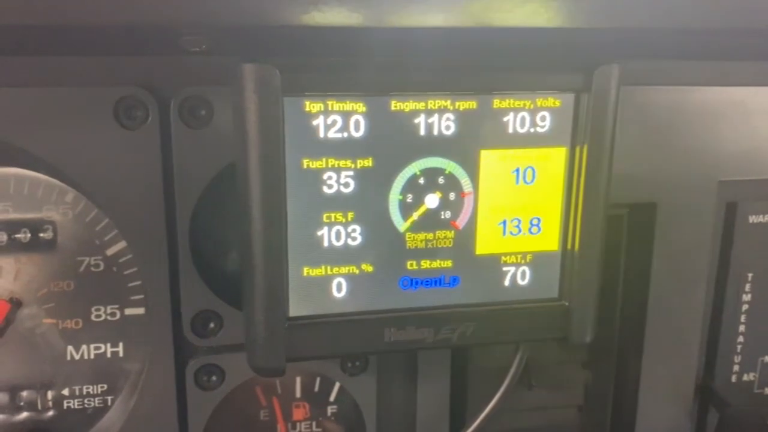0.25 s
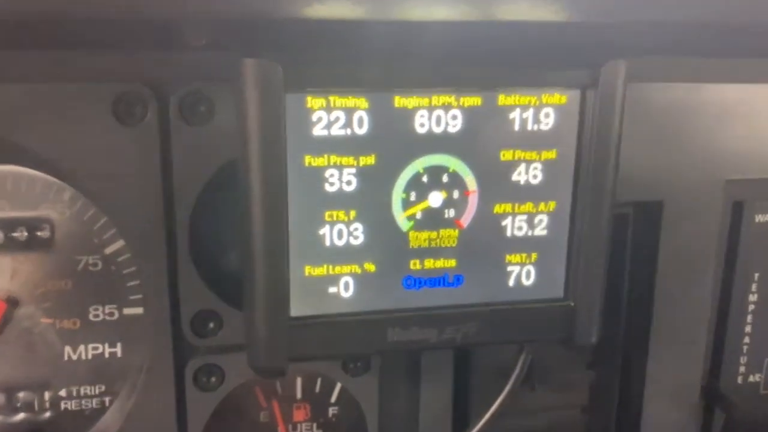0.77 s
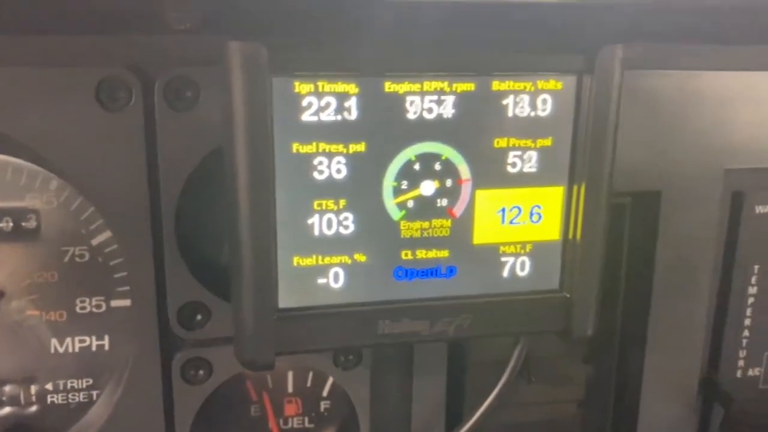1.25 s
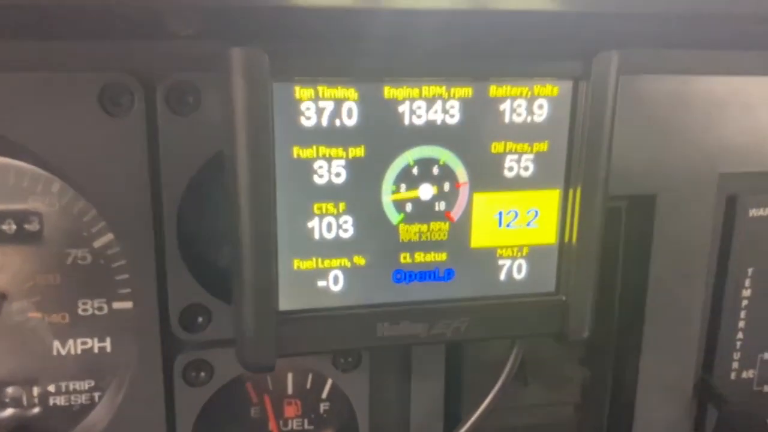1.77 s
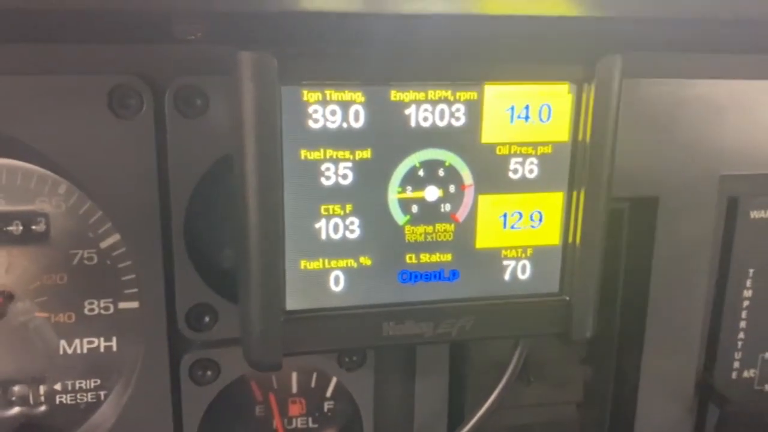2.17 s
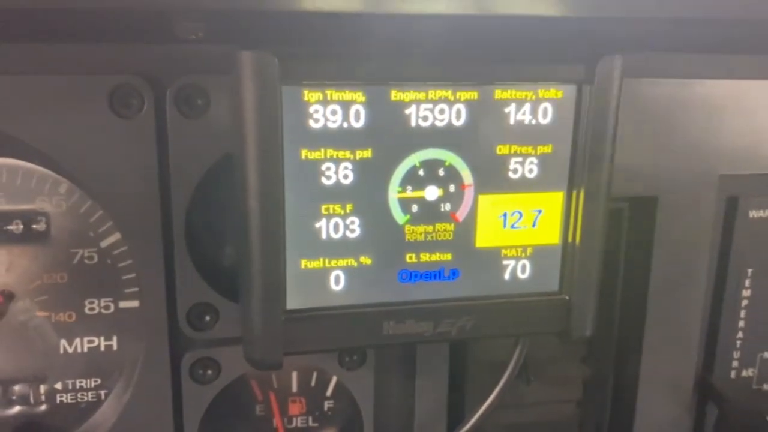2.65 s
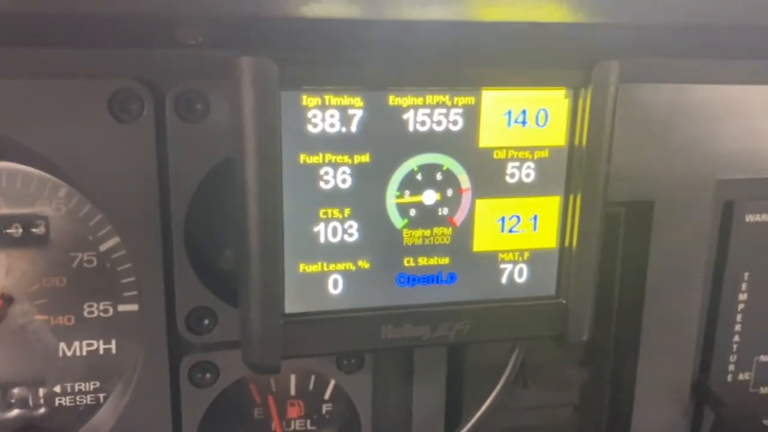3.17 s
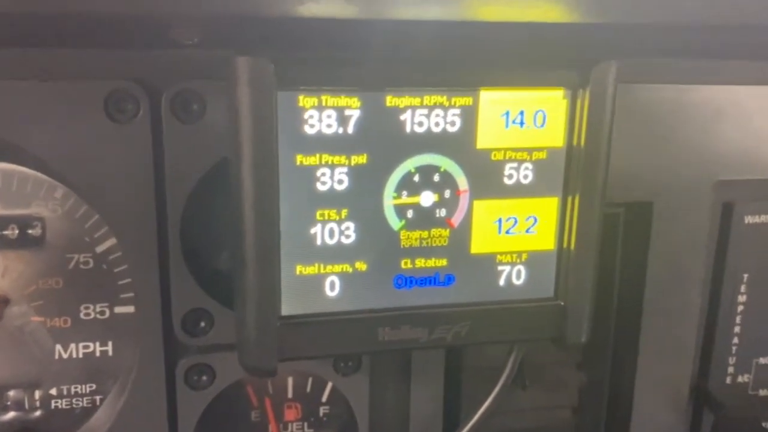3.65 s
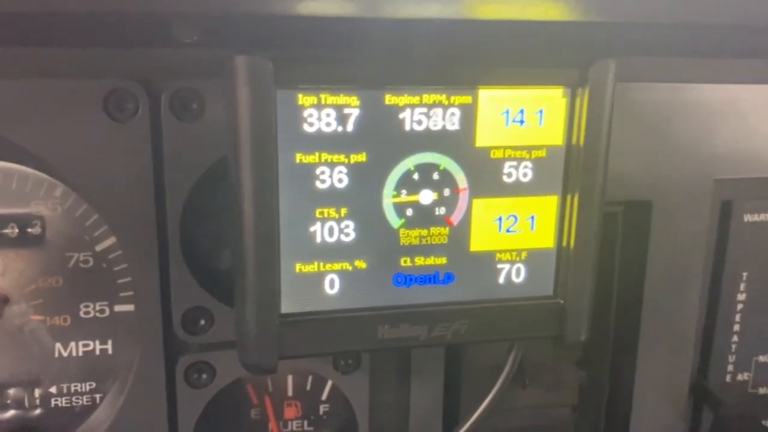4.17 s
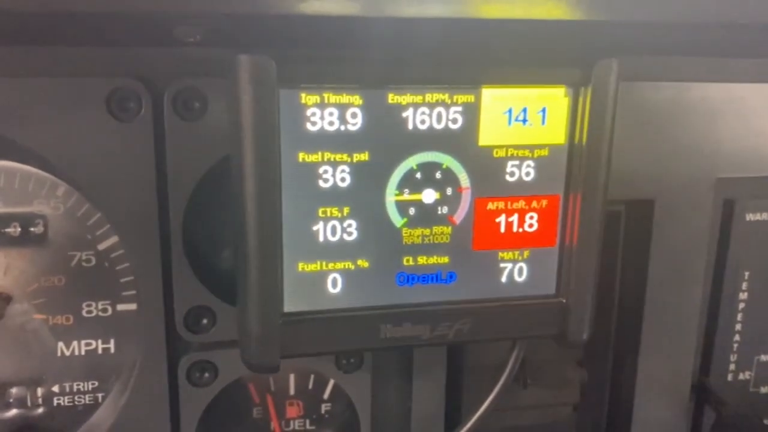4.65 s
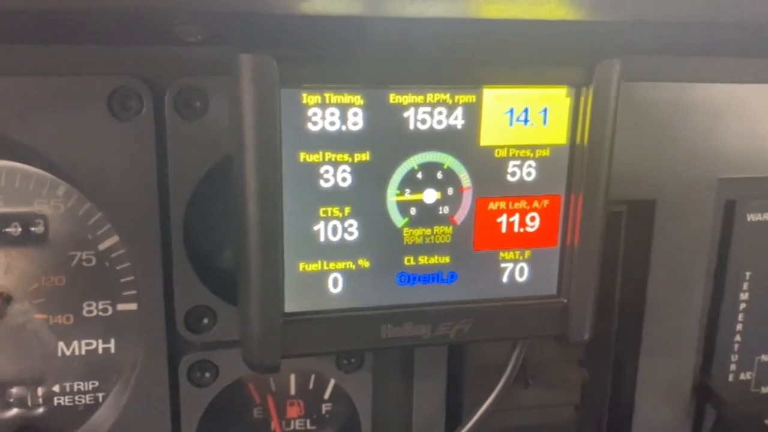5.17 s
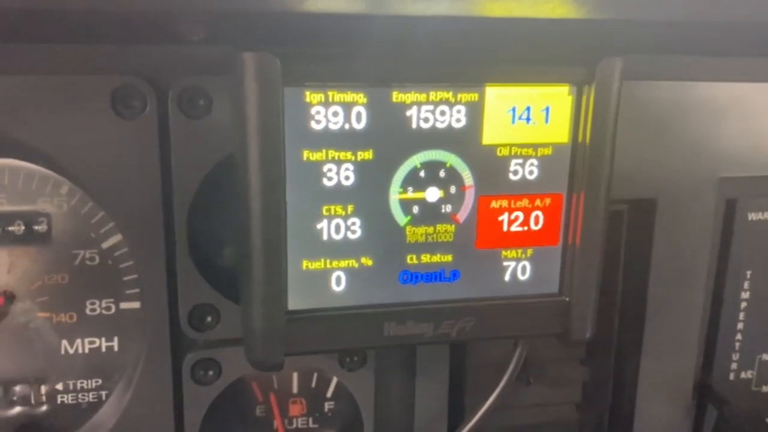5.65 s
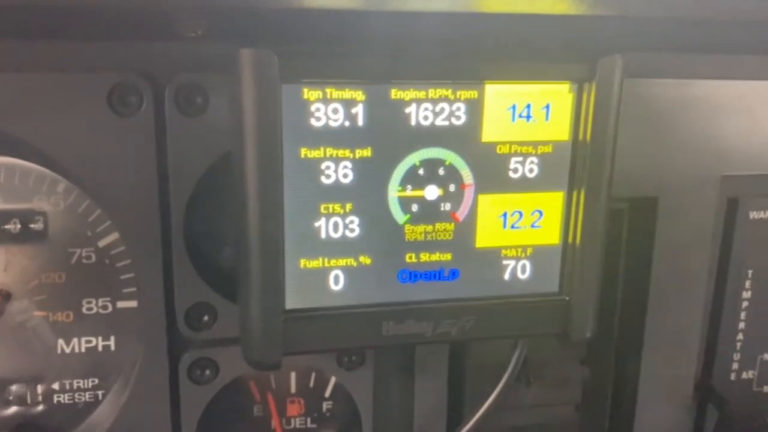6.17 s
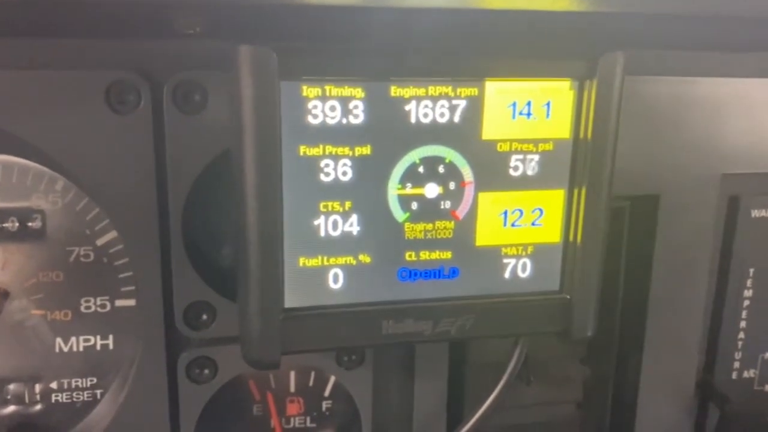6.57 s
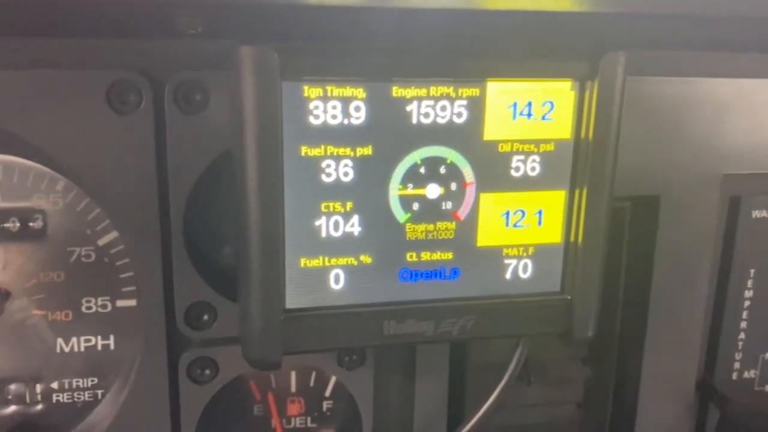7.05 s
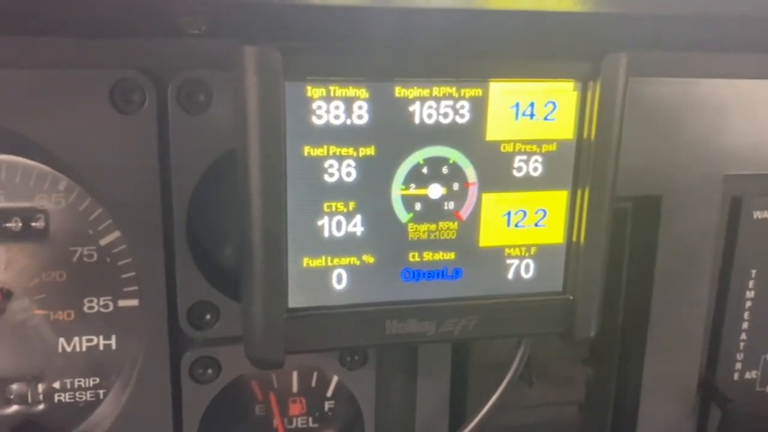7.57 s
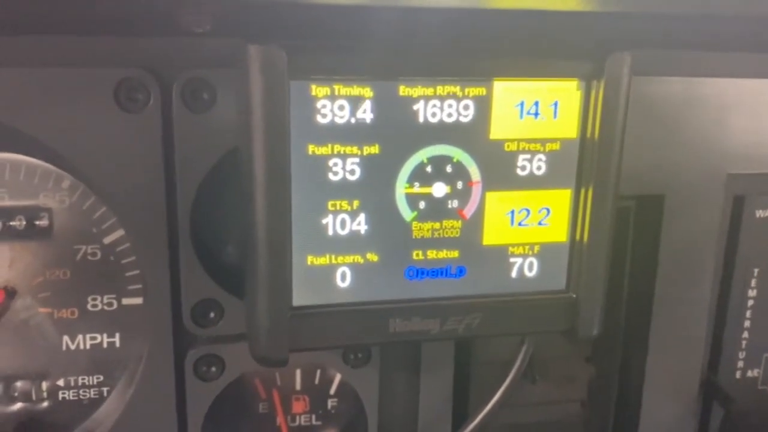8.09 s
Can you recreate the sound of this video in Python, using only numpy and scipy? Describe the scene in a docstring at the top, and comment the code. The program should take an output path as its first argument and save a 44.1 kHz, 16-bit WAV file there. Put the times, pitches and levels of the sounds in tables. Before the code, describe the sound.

Close handheld microphone in a small, slightly reverberant car cabin. Gritty metallic cranking gives way to irregular bassy firings and small misfire gaps, then a strong droning surge whose peaks are pressed flat, with airy hiss and a few trim ticks. The engine falls back through a couple of thuds to a soft, throbbing fast idle with mechanical clatter and tappet ticks.

```python
"""Inside a car, at the driver's seat, a cold V8 is started: the starter grinds, the first cylinders fire
unevenly, the engine flares with a hissing intake and settles into a loping fast idle.
One crankshaft phase times the firings: sines and resonated pulses form the exhaust boom, swelling noise
the rasp and intake hiss. Resonated noise forms starter, pulleys, knocks, buzzes and whistles; clicks drive
the valves. The boom's crests are pressed flat, with part of the mechanical sound riding on them."""
import sys
import numpy as np
from scipy import signal
from scipy.fft import rfft, irfft
from scipy.io import wavfile
from scipy.ndimage import uniform_filter1d, map_coordinates

SR = 44100
rng = np.random.default_rng(int(sys.argv[2]) if len(sys.argv) > 2 else 0)


def put_to_file(sound):
    """Save the sound as 16-bit audio at rate SR, in the file named by the first command-line argument."""
    columns = np.atleast_2d(sound).T  # one column per channel
    safe = np.clip(columns, -1, 1)
    whole_steps = np.round(safe * 32767)
    wavfile.write(sys.argv[1], SR, whole_steps.astype(np.int16))


N = 366912
TIME = np.arange(N) / SR  # s

# crankshaft speed, from cranking through catch and flare to a hunting fast idle: time_s, speed_rpm
CRANK_SPEED = [(0.0, 120), (0.45, 179), (0.79, 671), (1.27, 977), (1.5, 1223), (1.76, 1341), (2.0, 1580),
               (2.88, 1583), (3.24, 1540), (3.86, 1536), (4.8, 1599), (5.31, 1559), (6.01, 1603),
               (6.62, 1663), (6.81, 1581), (7.17, 1635), (8.32, 1664)]
# engine effort as exhaust pressure, from cranking to idle: time_s, level_db
EXHAUST_EFFORT = [(0, -32.5), (.1, -32.5), (.34, -43.5), (.46, -32), (.62, -15), (.84, -11.5), (1.1, -18.5),
                  (1.27, -14), (1.42, -7.5), (1.8, -8), (2.2, -7.5), (2.55, -11), (2.73, -14), (3.1, -23.5),
                  (3.3, -24), (3.42, -28), (4.6, -27), (8.32, -28)]
# evenness of firing, as the firing note over the effort: time_s, level_db
FIRING_EVENNESS = [(1.18, -37), (1.27, 3), (1.34, -3.5), (1.42, 5), (1.85, 6.5), (1.96, 1), (2.17, -4),
                   (2.85, -1.5), (5.9, -3.5), (6.3, -10.5)]
# relative strength of each cylinder in firing order: strength (no unit)
CYLINDER_STRENGTHS = [1.45, 1.67, 0.87, 1.41, 1.48, 1.09, 0.95, 1.43]
# surges of firings in the exhaust pipe: middle_s, length_s, pitch_hz, level_db
FIRING_SURGES = [(0.482, 0.081, 75.4, -24), (0.658, 0.099, 74.6, -16), (.85, 0.1, 79, -9.5),
                 (0.975, 0.09, 85.57, -9.5), (1.062, 0.054, 88.74, -16), (1.141, 0.097, 87.9, -15),
                 (1.21, 0.027, 76.7, -23), (2.699, .05, 107.8, -12.5), (2.849, 0.033, 105, -19),
                 (7.976, 0.081, 83, -26.5)]
# short gaps in boom and rasp from misfires of the cold engine: middle_s, lost_share
COLD_MISFIRES = [(0.724, 0.41), (.918, 0.53), (1.092, 0.5), (1.455, 0.72), (1.905, 0.48), (2.056, 0.36),
                 (2.126, .55), (2.655, 0.36)]
# hard firings, at the catch and on the way down from the flare: start_s, level_db (before body and gain)
HARD_FIRINGS = [(.545, -25), (.599, -12), (.612, -20), (.676, -34), (.818, -18), (.834, -23), (2.68, -22),
                (2.712, -20.5), (2.84, -26)]
# ticks of shaken dashboard trim: start_s, level_db (before resonance)
TRIM_TICKS = [(1.979, -37.5), (2.034, -35.5), (2.1545, -33.5), (2.1572, -33), (2.385, -48.5), (2.701, -39)]
# buzzes, whistles and whines, brief or drawn out: middle_s, pitch_hz, width_hz, half_length_s, level_db
NARROW_BANDS = [(0.334, 1100, 530, 0.052, -38), (0.57, 3220, 500, 0.024, -47.5), (1.7, 1990, 150, .25, -57),
                (1.678, 1415, 168, 0.32, -54), (1.824, 3610, 1098, .11, -61.5),
                (1.951, 882, 220, 0.21, -46), (2.291, 6840, 395, 0.02, -61), (2.377, 2050, 149, 0.13, -64),
                (2.666, 873, 150, .085, -50.5), (3.9, 2220, 120, 0.017, -57)]

# resonances, levels relative within each body: pitch_hz, width_hz, level_db
PIPE_AND_CABIN_MODES = [(65, 29, -14), (81.82, 26.9, 3.5), (99.55, 27.7, -3), (130.85, 16.3, -2.5),
                        (161.2, 14, -11), (221, 31, -14), (264.4, 75, -19)]
BODY_MOUNT_MODES = [(28.5, 15, 0.5), (41.7, 12, -3.5)]  # body on its mounts: pitch_hz, width_hz, level_db
STARTER_HOUSING_MODES = [(455, 50, 14), (700, 110, -1), (852, 31, 4.5), (1076, 42, 10), (1340, 41, 0.5),
                         (2660, 760, -5), (3150, 87, -25), (3880, 170, -19.5), (4480, 17, -17)]  # housing and flywheel: pitch_hz, width_hz, level_db
STARTER_MOTOR_MODES = [(48, 29, -2.5), (135, 78, -4.5), (160.4, 13, 5)]  # starter motor: pitch_hz, width_hz, level_db
ENGINE_BLOCK_MODES = [(459.4, 49, 7), (599, 75, 1), (720, 36, 3), (896, 24, -1.5), (970, 17, -1.5),
                      (1084, 18, -3), (1310, 16, -5), (1452, 48, -9.5)]  # block and brackets: pitch_hz, width_hz, level_db

# noise spectra, relative densities: frequency_hz, density_db (per Hz)
GEAR_SPECTRUM = [(450, 9), (750, 10.5), (1000, 9.5), (1300, 10.5), (1900, -6.5), (2700, -4), (3800, -4),
                 (5000, -8), (6500, -6.5), (7700, -24), (8500, -20), (9500, -32.5), (15000, -35.5)]  # starter teeth: frequency_hz, density_db
RASP_SPECTRUM = [(100, -17), (170, 11.5), (260, 11), (380, 2.5), (460, 5), (600, -6.5), (800, -18),
                 (1300, -28), (3000, -60.5)]  # exhaust turbulence: frequency_hz, density_db
CLATTER_SPECTRUM = [(350, -13.5), (650, 4.5), (850, 2.5), (1000, 3), (1100, 4), (1350, -4), (1700, -15.5),
                    (2500, -30.5), (4000, -33), (8000, -49)]  # rubbing pulleys: frequency_hz, density_db
INTAKE_SPECTRUM = [(1200, -21.5), (1700, 11), (2050, 16), (2500, 6.5), (3200, -9), (5600, -10), (6400, 5.5),
                   (6950, 13), (7600, -3), (8500, 5.5), (9200, -4), (10200, 3.5), (11800, -1.5), (14500, 2)]  # intake air: frequency_hz, density_db
VALVE_SPECTRUM = [(900, -15), (1600, 2), (2300, 2.5), (3200, 0.5), (4000, -4.5), (4900, -8), (6000, -5.5),
                  (6900, -8), (7700, -13), (15000, -18)]  # tappets: frequency_hz, density_db

IDLE_DB = -28  # the effort to which the layers' base levels refer
WEAKEST_S = 2.127  # the weakest cylinder fires here, and every two turns before and after
NOTE_WAVER_DB, LOPE_DB = 1.0, -0.75
# layers that follow the engine: base level (dB), dB per dB of effort, dB per dB of speed
SHUDDER_DB, SHUDDER_FOLLOWS, SHUDDER_WITH_SPEED = -33, 0.84, -.3  # mounts rock more at low speed
RASP_DB, RASP_FOLLOWS, RASP_WITH_SPEED = -47.5, 1.174, 0.53
CLATTER_DB, CLATTER_FOLLOWS, CLATTER_WITH_SPEED = -51.5, 0.12, .4
# the rasp grows ever faster with effort above idle; some groups of firings bark louder
RASP_FULL_DB, RASP_BEND, RASP_LUMPS_DB = 19.5, 0.34, 1.55
# the intake draws air from the catch to the top of the flare, then closes to its idle opening
INTAKE_OPEN_S, INTAKE_CLOSE_S, INTAKE_OPEN_DB, INTAKE_IDLE_DB = 0.62, 1.804, -51.5, -74
INTAKE_RISE_DB_PER_S, INTAKE_FALL_DB_PER_S = 66, 37.5
# the engine hesitates once before the flare; clatter and hiss duck
HESITATE_S, HESITATE_HALF_S, HESITATE_CLATTER_DB, HESITATE_HISS_DB = 1.144, .105, -7.5, -5
SURGE_LIFT = 0.34  # share of a surge that adds to the effort
MISFIRE_HALF_S = 0.015
# starter: eases as the load comes off, varies with each compression, then is released and runs out
STARTER_DB, STARTER_EASE_DB_PER_S, COMPRESSION_DB = -43.5, 6, 2
RELEASE_S, RUN_OUT_DB_PER_S = .87, 88
# overload: a fixed ceiling, which sinks with the effort as the engine settles
TOP_DB, HEADROOM_DB, SETTLE_S, SETTLE_TAKES_S = -4, 2.8, 2.4, .7
FLATTENED = 0.66  # share of rasp, clatter and starter that the boom's crests flatten
CUTOFF_HZ = 15500


def from_db(db):
    """Decibels to amplitude ratio."""
    return 10 ** (np.asarray(db) / 20)


def to_db(gain):
    """Amplitude ratio to decibels."""
    return 20 * np.log10(gain + 1e-9)


def rms_one(x):
    """Power normalisation: scale to rms 1."""
    return x / np.sqrt(np.mean(x ** 2) + 1e-20)


def evened(x, span_s):
    """Short-term power normalisation: bring the local rms to 1 over each short span."""
    size = max(int(span_s * SR), 2)
    power = uniform_filter1d(uniform_filter1d(x ** 2, size), size)
    return x / np.sqrt(np.abs(power) + 1e-14)


def in_time(rows):
    """Linear interpolation of each column of a curve at every sample."""
    s, *columns = np.transpose(rows)
    return [np.interp(TIME, s, c) for c in columns]


def plateau(middle_s, half_s):
    """Smooth window: 1 around the middle, one half at half_s, falling towards 0."""
    return 1 / (1 + ((TIME - middle_s) / half_s) ** 8)


def noise():
    """White noise: equal mean power at all frequencies."""
    return rng.standard_normal(N)


def drift(rate):
    """Slow random modulation with rms 1, through `rate` random knots per second."""
    knots = rng.standard_normal(400)
    coarse = map_coordinates(knots, [TIME[::40] * rate], order=3, mode="mirror")
    return rms_one(coarse).repeat(40)[:N]


def coloured(x, spectrum):
    """Spectral shaping: weight each frequency by a spectrum, with a bass skirt; rms 1."""
    hz, db = np.transpose(spectrum)
    bins = np.arange(N // 2 + 1) * SR / N + 1
    skirt = 1 / np.sqrt(1 + (hz[0] / bins / 2) ** 4)
    weight = from_db(np.interp(np.log(bins), np.log(hz), db))
    return rms_one(irfft(rfft(x) * skirt * weight, N))


def resonate(x, hz, width_hz):
    """Damped resonance: a two-pole filter with unit peak gain."""
    r = np.exp(-np.pi * width_hz / SR)
    zeros = np.array([1, 0, -1]) * (1 - r * r) / 2
    poles = [1, -2 * r * np.cos(2 * np.pi * hz / SR), r * r]
    return signal.lfilter(zeros, poles, x + 1e-18)


def ringing(x, modes):
    """Modal superposition: sum a body's resonances, each doubled for steep skirts; rms 1."""
    return rms_one(sum(from_db(db) * resonate(resonate(x, hz, width), hz, width) for hz, width, db in modes))


def fade(clicks, decay_s):
    """Exponential decay: every click jumps up and dies away."""
    return signal.lfilter([1], [1, -np.exp(-1 / (decay_s * SR))], clicks + 1e-18)


def bursts(events, decay_s):
    """Impulsive excitation: decaying noise at each event."""
    clicks = np.zeros(N)
    for s, db in events:
        clicks[round(s * SR)] = from_db(db)
    return fade(clicks, decay_s) * noise()


def strokes(turns, pattern, scatter):
    """Phase-locked impulses: four clicks a crankshaft turn, of patterned and random strength."""
    number = np.floor(turns * 4).astype(int)
    at = np.flatnonzero(np.diff(number))
    chance = rng.standard_normal(2000)
    clicks = np.zeros(N)
    clicks[at] = np.take(pattern, number[at], mode="wrap") + scatter * chance[:len(at)]
    return clicks


def puffs(turns, spectrum, decay_s, steady, scatter):
    """Pulsed turbulence: noise swells at every firing over a steady flow; local rms 1."""
    swell = fade(strokes(turns, CYLINDER_STRENGTHS, scatter), decay_s)
    return evened(coloured((steady + swell) * noise(), spectrum), span_s=0.027)


def narrow_bands():
    """Band-filtered noise: narrow bands swell and fade at set times, like buzzing trim or whistling air."""
    source, out = noise(), np.zeros(N)
    for s, hz, width, half, db in NARROW_BANDS:
        near = np.flatnonzero(np.abs(TIME - s) < .5)
        band = rms_one(resonate(resonate(source[near], hz, width), hz, width))
        swell = np.exp(-((TIME[near] - s) / half) ** 2 / 2)
        out[near] += from_db(db) * swell * band
    return out


def knocks():
    """Impulse response: hard firings thud through the body, and loose trim ticks."""
    thuds = resonate(bursts(HARD_FIRINGS, decay_s=0.012), 445, 160)
    ticks = resonate(resonate(bursts(TRIM_TICKS, decay_s=0.0017), 1200, 2200), 1200, 2200)
    return from_db(14.5) * resonate(thuds, 340, 310) + ticks


def valves(turns, rpm):
    """Repeated impact: tappets tick with the crankshaft, louder with speed; some click harder."""
    taps = fade(strokes(turns + 0.11, CYLINDER_STRENGTHS, scatter=0.33), decay_s=.002)
    # the fourth power leaves only the rare strong strokes
    hard = fade(strokes(turns + .1, [0], scatter=.39) ** 4, decay_s=.0007)
    flicker = from_db(1.2 * drift(20) + 0.8 * np.sin(2 * np.pi * turns))
    ticking = coloured((1.1 + taps + np.minimum(hard, 3)) * noise(), VALVE_SPECTRUM)
    return from_db(-64.5) * rpm / rpm.max() * flicker * ticking


def machinery(turns):
    """Friction-driven resonance: belt-driven pulleys rub and ring the block and brackets; rms 1."""
    pulley = np.cos(np.pi * 2.46 * turns) ** 8  # 2.46 rubs a crankshaft turn
    rub = noise() * (1 + 1.0 * pulley + 0.079 * np.sin(2 * np.pi * turns))
    return rms_one(coloured(rub, CLATTER_SPECTRUM) + from_db(-7.0) * ringing(rub, ENGINE_BLOCK_MODES))


def clatter(turns, load_db, speed_db, hesitation):
    """Load-dependent radiation: machinery noise rises with effort and speed and ducks once."""
    level_db = CLATTER_DB + CLATTER_FOLLOWS * load_db + CLATTER_WITH_SPEED * speed_db
    level_db = level_db + HESITATE_CLATTER_DB * hesitation
    return from_db(level_db + 1.2 * drift(16)) * machinery(turns)


def starter(turns):
    """Forced vibration: grinding pinion teeth ring the housing; the motor growls below."""
    compression = np.cos(8 * np.pi * turns)
    run_out_db = RUN_OUT_DB_PER_S * np.clip(TIME - RELEASE_S, 0, 1)
    level_db = STARTER_DB - STARTER_EASE_DB_PER_S * TIME + COMPRESSION_DB * compression - run_out_db
    teeth = noise() * from_db(2.0 * drift(90))
    grind = from_db(7.5) * coloured(teeth, GEAR_SPECTRUM)
    housing = from_db(1.0) * ringing(teeth, STARTER_HOUSING_MODES)
    growl = from_db(6.5) * ringing(noise(), STARTER_MOTOR_MODES)
    return from_db(level_db) * (grind + housing + growl)


def intake_level():
    """Throttled flow: the hiss level rises at the catch, holds in the flare and falls to idle."""
    before_db = INTAKE_RISE_DB_PER_S * np.maximum(INTAKE_OPEN_S - TIME, 0)
    after_db = INTAKE_FALL_DB_PER_S * np.maximum(TIME - INTAKE_CLOSE_S, 0)
    return np.maximum(INTAKE_OPEN_DB - (before_db + after_db), INTAKE_IDLE_DB)


def intake(turns, hesitation):
    """Flow noise: indrawn air hisses in puffs with the firings and ducks at the hesitation."""
    level_db = intake_level() + HESITATE_HISS_DB * hesitation + 2.4 * drift(26)
    return from_db(level_db) * puffs(turns, INTAKE_SPECTRUM, decay_s=0.0059, steady=1.1, scatter=0.81)


def rasp(turns, load_db, speed_db):
    """Jet turbulence: exhaust noise grows faster than the effort and barks unevenly."""
    turbulence_db = RASP_FULL_DB * np.clip(load_db / RASP_FULL_DB, 0, 2) ** (1 + RASP_BEND)
    level_db = RASP_DB + RASP_FOLLOWS * turbulence_db + RASP_WITH_SPEED * speed_db
    barks = puffs(turns, RASP_SPECTRUM, decay_s=0.0089, steady=0.89, scatter=0.46)
    return from_db(level_db + RASP_LUMPS_DB * drift(9.3)) * barks


def misfires():
    """Amplitude gating: the gain is 1 but for a brief dip at each misfire."""
    gaps = [1 - np.clip(lost, 0, 1) * plateau(s, MISFIRE_HALF_S) for s, lost in COLD_MISFIRES]
    return np.prod(gaps, axis=0)


def catching():
    """Pipe resonance: each surge of firings sounds its own wavering pitch; returns sound and strength."""
    clock = np.cumsum(1 + 0.026 * drift(25)) / SR
    swells = [(hz, from_db(db) * plateau(s, length / 2)) for s, length, hz, db in FIRING_SURGES]
    sound = np.sqrt(2) * sum(swell * np.sin(2 * np.pi * hz * clock) for hz, swell in swells)
    return sound, sum(swell for _, swell in swells)


def blowdown(turns, opening, scatter):
    """Pulse duration: departures from the mean firing last a fixed crank angle, so low speed is duller."""
    number, part = np.divmod(turns * 4, 1)
    number = number.astype(int)
    chance = rng.standard_normal(2000)
    departure = np.take(CYLINDER_STRENGTHS, number, mode="wrap") - np.mean(CYLINDER_STRENGTHS)
    strength = departure + scatter * chance[number]
    return strength * np.sin(np.pi * np.minimum(part / opening, 1)) ** 2


def boom(turns, effort_db, speed_db):
    """Periodicity: what firings share is a steady note; their differences excite lope and body shudder."""
    even_db, = in_time(FIRING_EVENNESS)
    note_db = effort_db + even_db
    lope_db = effort_db - to_db(np.hypot(1, from_db(even_db)))  # even firing leaves little lope
    shudder_db = SHUDDER_DB + SHUDDER_FOLLOWS * (lope_db - IDLE_DB) + SHUDDER_WITH_SPEED * speed_db
    phase = 8 * np.pi * turns  # four firings a turn
    note = np.sqrt(2) * (np.sin(phase) + from_db(-20.5) * np.sin(2 * phase))
    uneven = blowdown(turns, opening=0.36, scatter=0.47) + from_db(-8.0) * noise()
    running = np.clip(np.gradient(turns) * SR / 18, .5, 1)  # slow, dull pulses shake the cabin less
    shaken = evened(ringing(uneven, PIPE_AND_CABIN_MODES), span_s=0.13)
    lope = running * from_db(lope_db + LOPE_DB) * shaken
    both = from_db(note_db + NOTE_WAVER_DB * drift(11)) * note + lope
    # the boom sags a little once a turn, and deeply at the weakest cylinder
    crank = turns - np.interp(WEAKEST_S, TIME, turns)
    weakest = np.cos(np.pi * crank / 2) ** 8
    turn_sag = .11 - .28 * np.cos(2 * np.pi * crank + .5 * drift(9))
    sag = turn_sag - .36 * weakest * (1 + .25 * drift(8))
    unsteady = np.clip(from_db(lope_db - note_db + 2.5), 0, 1)  # a strong even note hardly sags
    shudder = from_db(shudder_db) * evened(ringing(uneven, BODY_MOUNT_MODES), span_s=0.16)
    return both * (1 + unsteady * sag) + shudder


def cabin(x, wet_db, t60):
    """Reverberation: dense reflections between glass and panels decay exponentially."""
    size = SR // 4
    tail = rng.standard_normal(size) * from_db(-60 * TIME[:size] / t60)
    reflected = signal.fftconvolve(x, tail / np.linalg.norm(tail))[:N]
    wet = from_db(wet_db)
    return (x + wet * reflected) / np.hypot(1, wet)


def overload(x, ceiling_db):
    """Saturation: crests beyond the ceiling are pressed flat, with a rounded knee."""
    top = from_db(ceiling_db)
    return x / (1 + np.abs(x / top) ** 8) ** (1 / 8)


def scene():
    """Superposition: speed and effort drive the engine layers, and boom crests partly flatten the rest."""
    rpm, = in_time(CRANK_SPEED)
    turns = np.cumsum(rpm * (1 + .004 * drift(14))) / (60 * SR)
    surges, surge_strength = catching()
    effort_db = to_db(from_db(in_time(EXHAUST_EFFORT)[0]) + SURGE_LIFT * surge_strength)
    load_db, speed_db = effort_db - IDLE_DB, to_db(rpm / np.median(rpm))
    hesitation = plateau(HESITATE_S, HESITATE_HALF_S)
    settled = np.clip((TIME - SETTLE_S) / SETTLE_TAKES_S, 0, 1)
    ceiling_db = TOP_DB + settled * np.minimum(effort_db + HEADROOM_DB - TOP_DB, 0)

    background = narrow_bands() + knocks() + valves(turns, rpm) + intake(turns, hesitation)
    gaps = misfires()
    mechanical = clatter(turns, load_db, speed_db, hesitation) + starter(turns)
    inside = cabin(gaps * rasp(turns, load_db, speed_db) + mechanical, wet_db=-7.0, t60=0.24)
    share = np.clip(FLATTENED, 0, 1)
    pressure = gaps * boom(turns, effort_db, speed_db) + surges + share * inside
    return (background + overload(pressure, ceiling_db) + (1 - share) * inside)[None]


def record(dry):
    """Band limitation: a steep low-pass filter removes the top."""
    return signal.sosfilt(signal.ellip(12, .1, 90, CUTOFF_HZ, fs=SR, output="sos"), dry)


dry = scene()
out = record(dry)
put_to_file(out)
```